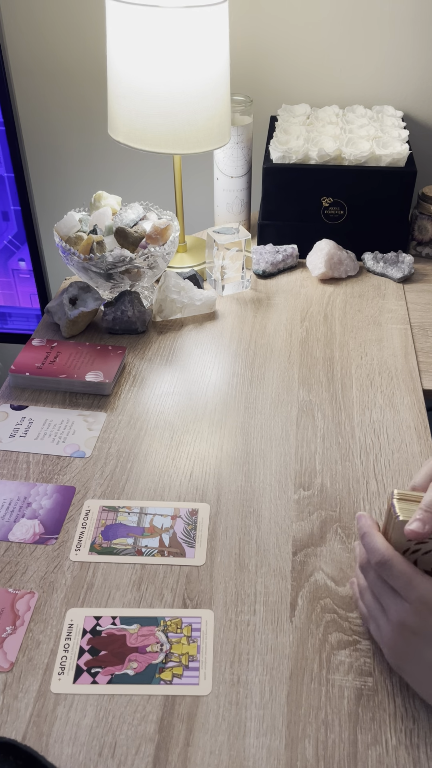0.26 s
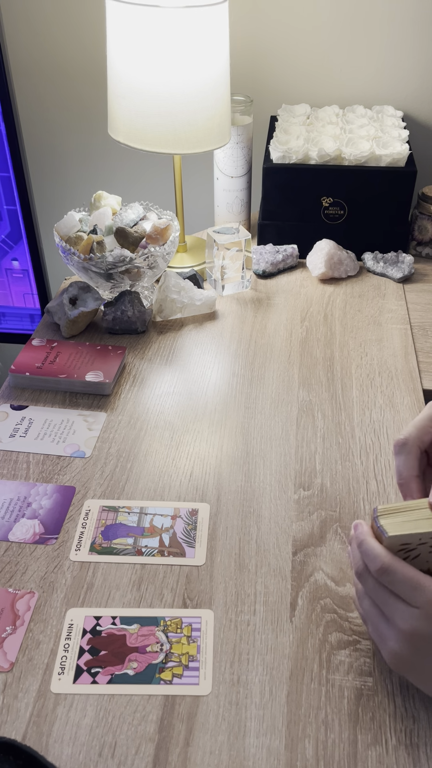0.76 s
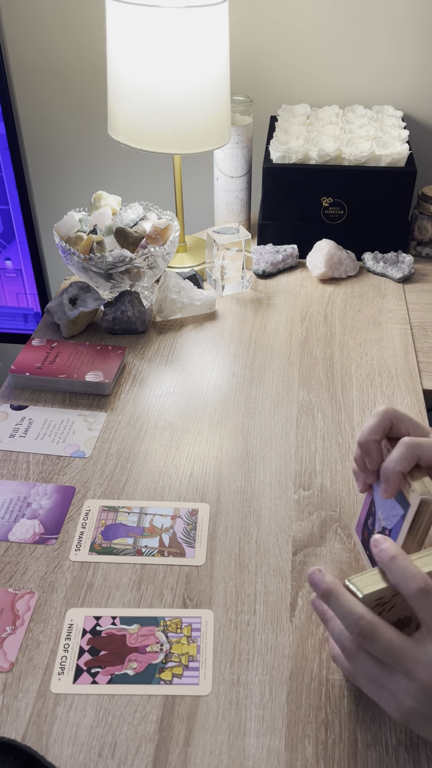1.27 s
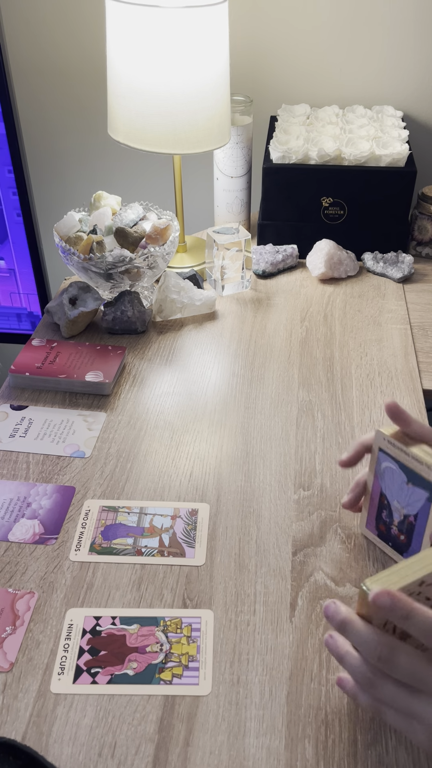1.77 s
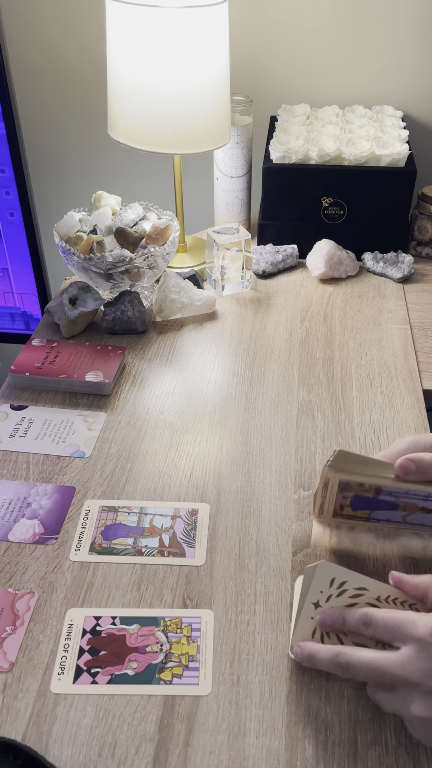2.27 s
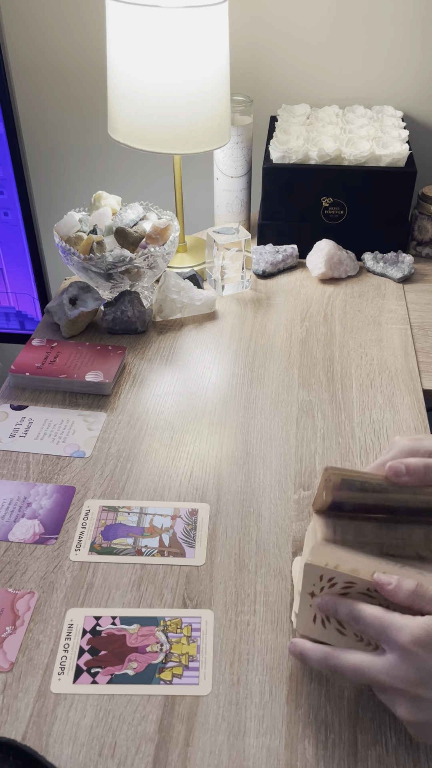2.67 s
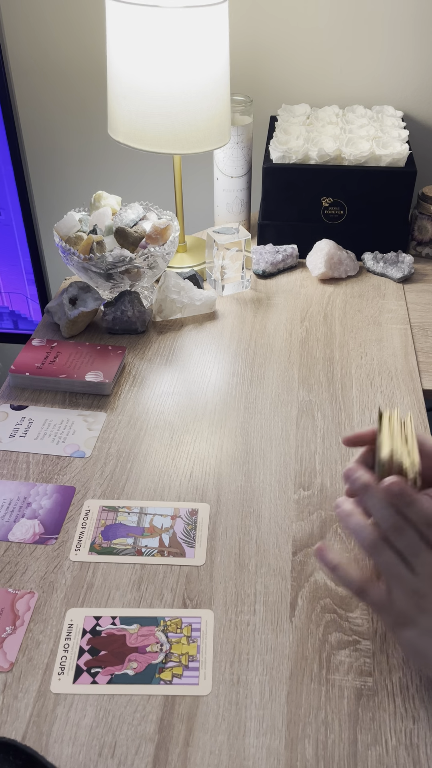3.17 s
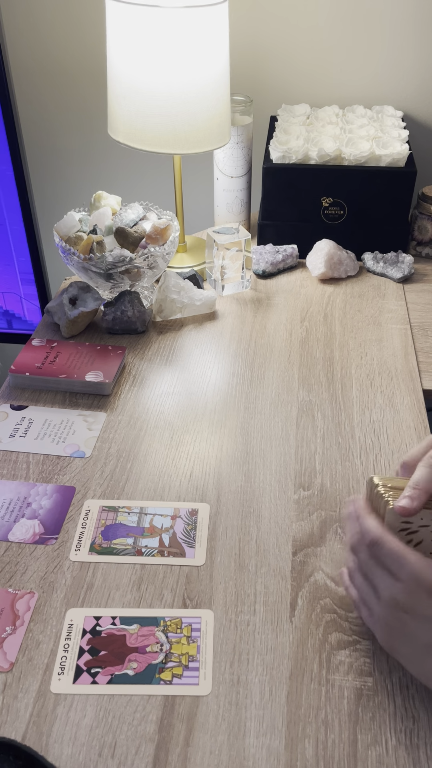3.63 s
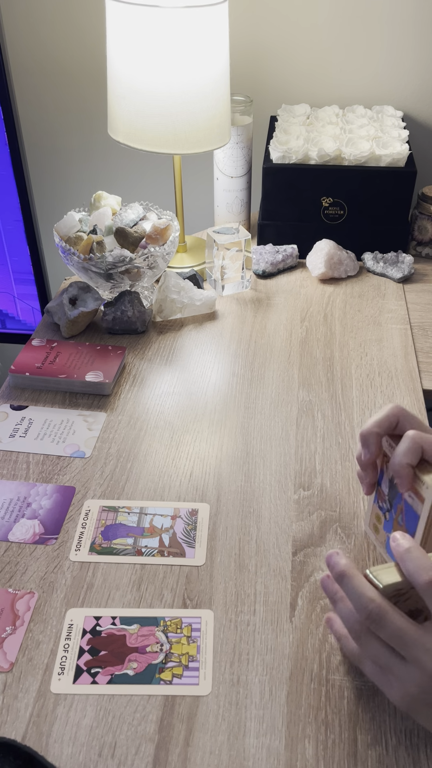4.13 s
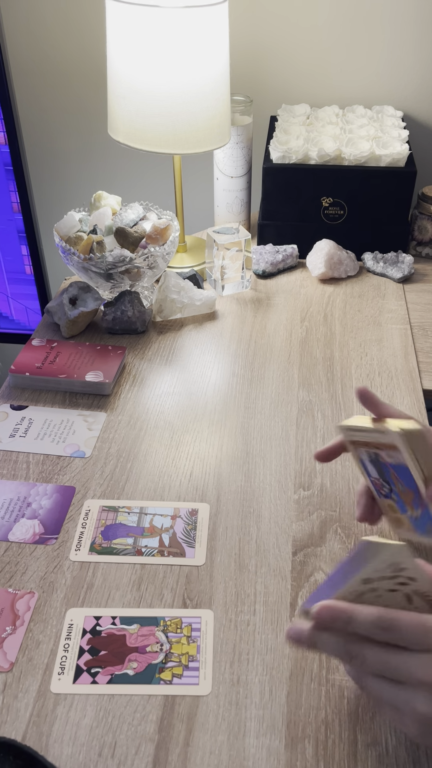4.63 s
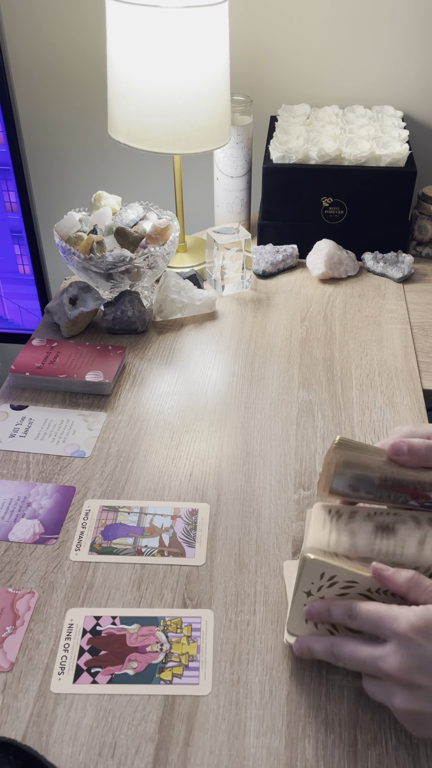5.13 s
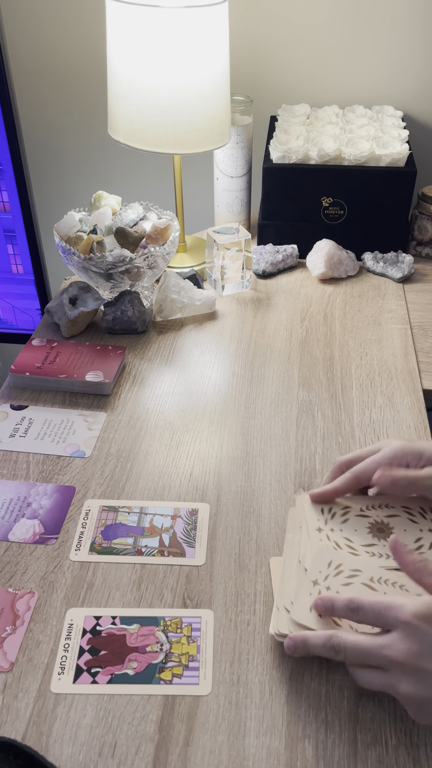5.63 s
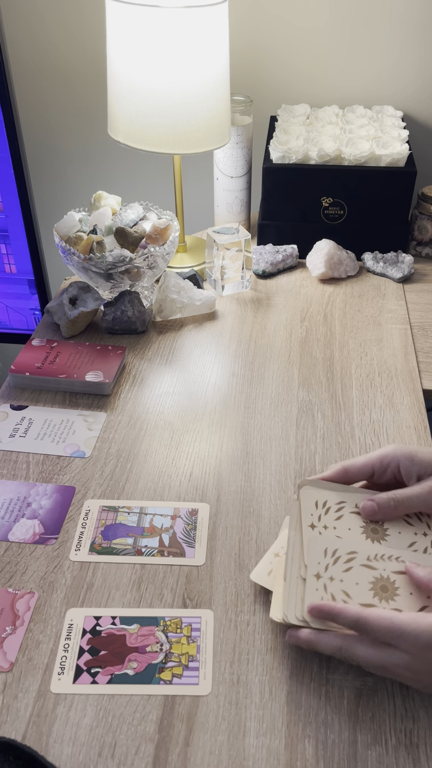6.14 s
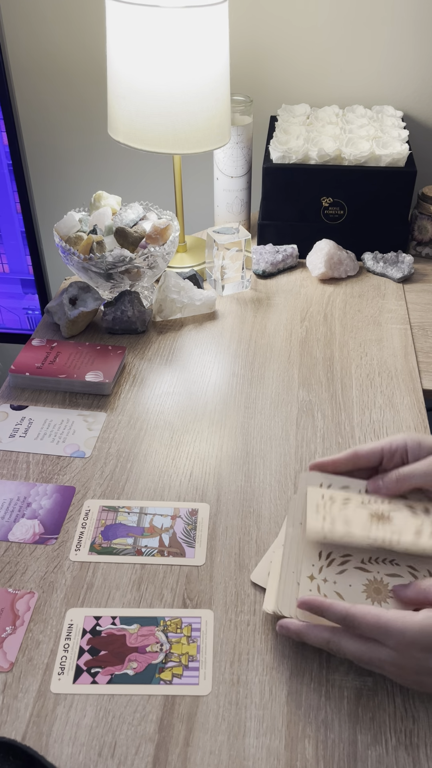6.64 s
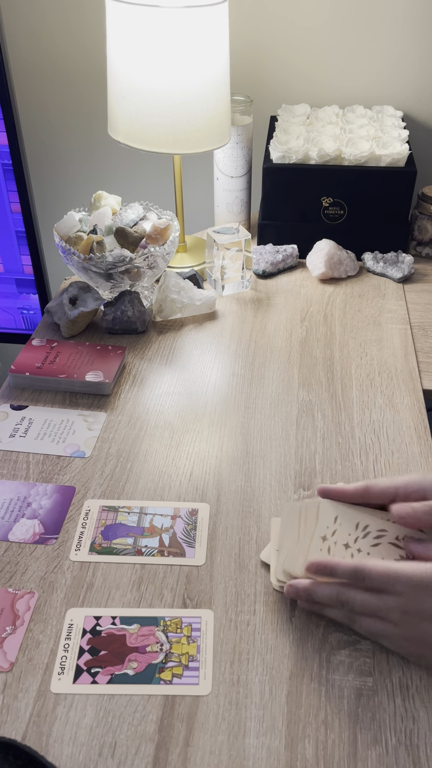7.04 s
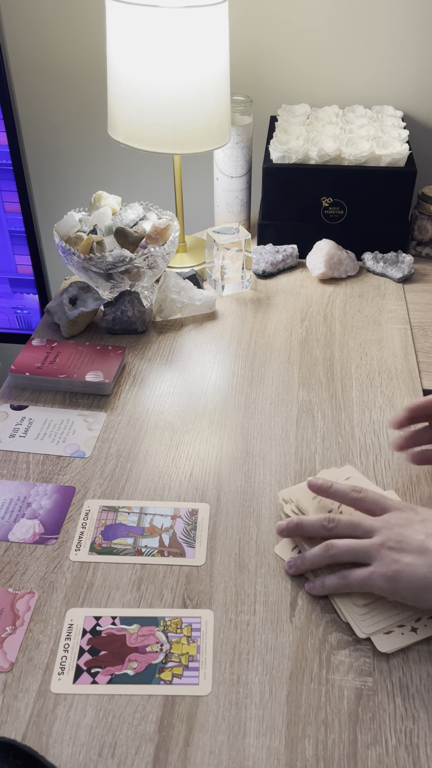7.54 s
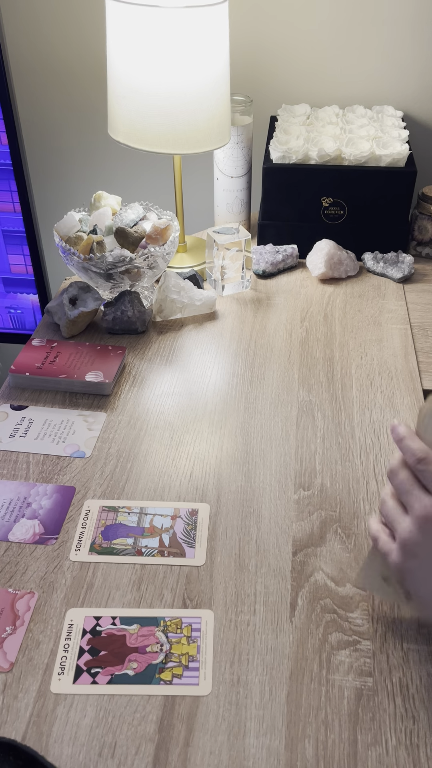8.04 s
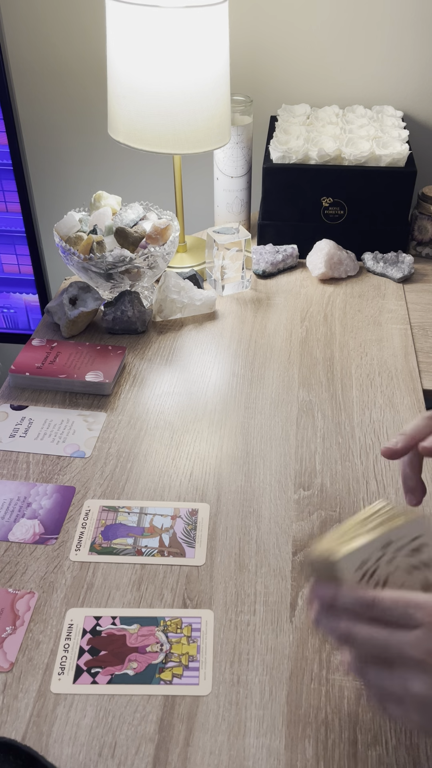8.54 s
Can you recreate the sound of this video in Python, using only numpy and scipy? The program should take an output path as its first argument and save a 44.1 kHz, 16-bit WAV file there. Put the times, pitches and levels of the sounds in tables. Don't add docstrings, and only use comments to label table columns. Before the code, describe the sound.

Stiff cards are shuffled close up on a wooden desk, with sharp claps, knocks, quick ticking riffles and papery slides over a low hum.

```python
import sys
import numpy as np
from scipy import signal
from scipy.fft import rfft, irfft
from scipy.io import wavfile
from scipy.ndimage import uniform_filter1d, minimum_filter1d

SR = 44100
rng = np.random.default_rng(int(sys.argv[2]) if len(sys.argv) > 2 else 0)


def invert_db(level):
    return 10 ** (np.asarray(level, dtype=float) / 20)


def bounce(signal):
    frames = np.transpose(np.atleast_2d(signal))
    limited = np.clip(frames, -1, 1)
    pcm = np.round(limited * 32767).astype(np.int16)
    wavfile.write(sys.argv[1], SR, pcm)


N = 388080

# [t/s, peak level/dB, air pocket f/Hz, edge tick re
# peak/dB]
HELD_CONTACTS = [(1.193, -19, 2107, -12), (1.213, -17, 2930, -19), (1.311, -18.5, 2090, -32),
                 (1.479, -20.5, 1816, -51), (2.341, -15.5, 2470, -4), (2.911, -38, 1970, -26),
                 (2.929, -29, 2080, -54), (3.004, -30, 1970, -31), (3.212, -16.5, 4220, -23), (3.32, -14, 2940, -8),
                 (3.748, -25, 1300, -44), (3.894, -19.5, 1570, -32), (4.052, -33, 2050, -6),
                 (4.063, -17, 1200, -38), (4.194, -14.5, 1670, -7.5), (4.851, -12, 2300, -14.5),
                 (4.933, -31.5, 2050, 5.5), (4.978, -13, 2000, -7.5), (4.988, -10, 2050, -10),
                 (5.004, -17, 1290, -10), (7.28, -37.5, 2360, -25), (7.69, -26, 993, -12.5),
                 (8.145, -23, 2260, -22), (8.199, -4.5, 2980, -20), (8.235, -9, 2332, -15), (8.246, 4, 2100, -3),
                 (0.116, -6, 2080, -12), (0.206, -11, 2700, -12.5), (1.522, -37, 1650, -38), (3.215, -6, 860, -30),
         (3.361, -17.5, 2370, -14), (3.662, -17, 2100, -22), (3.676, -35, 2050, -17),
         (3.812, -33, 1200, -24), (3.884, -32, 1240, -12.5), (3.957, -21, 2160, -18),
         (4.001, -32, 870, -28), (4.094, -32, 1450, -28), (4.847, -8.5, 2120, -11.5), (4.86, -19, 2530, -3),
         (4.992, -13, 1670, -16), (5.018, -21, 2970, -12.5), (5.083, -34, 1500, -20),
         (5.227, -39, 1490, -20), (5.309, -26, 1830, -16), (5.76, -32.5, 1400, -15),
         (5.796, -32, 2450, -24), (6.246, -36.5, 1320, -29), (6.52, -29, 1720, -24), (6.65, -33, 1450, 5.5),
         (6.804, -41, 2070, -3), (7.207, -41, 2220, -22), (7.299, -39, 2380, -24.5),
         (8.131, -27, 1160, -27), (8.188, -10.5, 3100, -15.5)]
# [t/s, peak level/dB, air pocket f/Hz, knock re peak/dB, edge tick re peak/dB]
KNOCKS = [(0.092, -4.5, 1444, -20, -26.5), (0.102, -5.5, 1616, -15, -16), (0.202, 5, 2790, -5.5, -7),
          (1.105, -9, 2320, -16, -17), (1.27, -9.5, 1500, -10, -30), (1.503, -10, 1610, -13, -19),
          (1.605, -28, 1020, -1, -43), (1.77, -4.5, 910, -8.5, -18.5), (1.808, 3, 2400, -8, -7.5),
          (2.218, -7, 1700, -9, -21.5), (2.326, -15.5, 1700, -4, -13), (3.221, -8.5, 897, -7, -30),
          (3.523, -6.5, 2280, -13, -6.5), (3.674, -16.5, 1860, -4.5, -12), (3.898, -24.5, 1230, 1.5, -5.5),
          (3.968, -22, 844, -3, -43), (4.077, -14.5, 1840, -6, -24), (4.382, 0.5, 1880, -19.5, -16.5),
          (4.396, 5, 1210, 0, -13), (7.678, -26, 1070, -4, -28.5), (8.125, -14.5, 1160, -4.5, -37.5),
          (8.183, -8.5, 2060, -20, -42), (8.261, -30.5, 1230, -14, -21.5), (8.773, -18.5, 890, 10.5, -12.5)]
# [t/s, peak level/dB, air pocket f/Hz, edge tick re peak/dB, spill time/ms]
FLUTTERS = [(0.097, -3, 1560, -30.5, 9), (.111, 0, 1583, -33.5, 11), (0.124, -7, 2630, -16.5, 19),
            (0.13, -7, 2090, -16, 7.7), (0.144, -9, 2570, -18, 8), (1.312, -16, 1130, -10, 4.7),
            (1.512, -12, 1770, -25, 7), (2.227, -22.5, 1870, -74, 1.37), (3.222, -6.5, 990, -10.5, 20.4),
            (3.238, -8.5, 2420, -14, 20), (3.326, -8.5, 2900, -24, 3.5), (3.975, -18, 1610, -22.5, 9.9),
            (4.089, -14.5, 1640, -32, 11.6), (4.411, -10, 2630, -14, 3.9), (8.209, -9.5, 2420, -12.5, 11),
            (8.254, 3, 1520, -10, 8.8), (8.268, -10.5, 1163, -18.5, 2.1), (8.39, -16.5, 1163, -39, 57),
            (8.417, -28, 1415, -17, 29), (8.783, -33, 1084, -32, 3.8)]
# [t/s, peak level/dB, edge tick re peak/dB]
FIRST_RIFFLE = [(2.416, -26, -37), (2.458, -23, -53), (2.469, -24.5, -5), (2.501, -24.5, 1.5),
                (2.52, -21.5, -13), (2.549, -22.5, -1), (2.563, -19, -10), (2.605, -23, -17),
                (2.617, -25, -19), (2.65, -25, 6), (2.662, -25.5, -20), (2.687, -23, -4), (2.716, -18, -14),
                (2.732, -25.5, -11), (2.749, -32, -19), (2.762, -27, -8)]
RIFFLE_POCKET_HZ, RIFFLE_SCATTER_SHARE = 1950, 0.04
# [t/s, peak level/dB, air pocket f/Hz, edge tick re peak/dB]
SECOND_RIFFLE = [(5.052, -20, 2010, -27), (5.068, -25, 1510, -13), (5.089, -24.5, 1600, 1),
                 (5.125, -35, 2060, -22), (5.141, -28, 1960, 5), (5.168, -16, 1880, -11),
                 (5.186, -38, 1920, 9), (5.224, -18.5, 1490, -11), (5.237, -31, 1120, -2),
                 (5.254, -34, 1120, 8), (5.278, -45, 2540, 7), (5.313, -26.5, 1870, 9),
                 (5.335, -39, 2100, -6), (5.357, -36, 3850, 15), (5.378, -22.5, 1690, 0),
                 (5.395, -37, 1410, -10), (5.431, -26, 2080, 7), (5.474, -30.5, 3870, 0)]
# [t/s, peak level/dB, air pocket f/Hz, edge tick re peak/dB]
LAID_CARDS = [(5.624, -48, 1030, 14), (5.636, -33, 2090, 3), (5.652, -23.5, 1150, -19),
              (5.668, -23, 1130, -15), (5.99, -24, 3860, -12), (6.013, -21.5, 1820, 1),
              (6.281, -33, 1600, -2), (6.429, -18.5, 1600, -7), (6.456, -26, 2120, -51),
              (6.509, -36, 1530, 4), (6.536, -31, 1440, -21), (6.573, -28, 1610, -2),
              (6.618, -25.5, 1310, -3), (6.64, -22, 1310, -2), (6.83, -21, 4000, -13),
              (6.905, -29.5, 3060, -1)]
# [t/s, peak level/dB, f/Hz]
BUMPS = [
    (0.116, -18.5, 354),
    (0.207, -12, 328.5),
    (1.108, -21, 520),
    (1.271, -11, 550),
    (1.515, -11.5, 358),
    (4.4, -8.5, 723),
    (3.997, -23, 540),
    (7.205, -34.5, 231),
    (7.852, -35, 498),
    (8.444, -24.5, 294),
]
HELD_KNOCK_DB, RIFFLE_KNOCK_DB, LAID_KNOCK_DB, SPILL_KNOCK_DB, BUMP_KNOCK_DB = -25.5, -11, -36, -16, 0.5
BUMP_TICK_DB = -48.5
CLAP_MS, CARD_MS, BUMP_MS, KNOCK_MS = 4.3, 3.4, 9.0, 3.45
HOLLOW_DB_PER_OCTAVE = 3
LUMPS_DB = 3

# [f/Hz, level/dB]
PUFF_TONE = [(300, 0), (700, -1.5), (1500, -4), (2500, -2.5), (3100, -5.5), (3500, -11.5)]
# [f/Hz, level/dB]
TICK_TONE = [(3500, 5), (5000, 4), (7000, -3), (9000, -4.5), (12000, -14), (15000, -13.5), (16500, -27)]
# [f/Hz, level/dB, t60/s]
DESK_MODES = [(138.9, -3, 0.37), (231, -10.5, 0.12), (364.5, 1.5, 0.086), (426.3, 1, 0.1),
              (517, 8.5, 0.026), (604, -14.5, .05), (910, -14.5, 0.03)]

# [t/s, peak level/dB, f/Hz, length/ms]
FLICKS = [(0.1329, -3, 5470, 5.1), (0.1454, -9.5, 3880, 4.4), (0.2034, -17, 5000, 2.5),
          (1.8079, -1, 5250, 3.7), (2.2174, -40, 5000, 0.83), (2.329, -54.5, 4950, 1.9),
          (2.3402, -32, 5200, 2.1), (2.47, -42, 5860, 2.5), (2.505, -29, 3780, 3.9),
          (2.5486, -31, 5080, 2.5), (2.567, -22, 5370, 1.5), (2.605, -21, 6060, 2.3),
          (2.6204, -11.5, 7100, 1.4), (2.65, -36, 7190, 1.8), (2.668, -30, 6100, 2.2),
          (2.7357, -22, 5700, 2.7), (2.7636, -27, 5750, 2.5), (3.2133, -12.5, 4050, 2.8),
          (3.24, -9, 4940, 3.8), (3.3177, -14, 5200, 5.7), (3.675, -21, 5300, 3.1),
          (4.0513, -27, 3620, 2.5), (4.0934, -23, 4560, 3.1), (4.8614, -32, 4880, 2.3),
          (4.934, -44, 4640, 2.3), (4.9813, -36, 4770, 3.1), (5.007, -18, 6040, 3.3),
          (5.0174, -15, 6000, 2.5), (5.084, -26, 5130, 2.9), (5.1275, -31.5, 5230, 3.1),
          (5.1622, -41, 4350, 2.5), (5.2505, -35, 5660, 2.5), (5.3163, -35, 5400, 2.5),
          (5.3358, -36, 5430, 2.5), (5.3577, -33, 4680, 2.5), (5.378, -21.5, 6030, 2.1),
          (5.396, -26, 5600, 2.3), (5.433, -36, 5400, 1.6), (5.9893, -27, 3900, 2.7),
          (6.3929, -35, 3800, 2), (6.429, -37, 5090, 2.7), (6.5016, -33, 4800, 2.5),
          (6.7605, -57, 5080, 4.7), (6.8309, -14, 7100, 4.8), (8.2123, -12.5, 4470, 2.5),
          (8.235, -6, 4990, 2.7), (8.2475, -12.5, 4370, 2.8)]
# [t/s, peak level/dB, f/Hz, length/ms]
CLACKS = [(.118, -17.5, 850, 2.9), (.205, -9.5, 2660, 6), (1.213, -47, 1210, 6.7), (1.272, -13, 1660, 2.8),
          (1.272, -12, 590, 8.6), (1.518, -32.5, 1650, 4.2), (1.6, -36.5, 1040, 8.1), (1.773, -25, 990, 13),
          (1.81, -6, 3200, 6.2), (3.224, -16.5, 834, 5.3), (3.53, -19, 1610, 11), (3.528, -18, 2850, 13),
          (3.677, -27.5, 1910, 15), (4.08, -25.5, 1800, 6), (4.399, -9.5, 1050, 12), (4.408, -19, 4800, 11),
          (5.086, -25.5, 1680, 4.9), (5.167, -26.5, 1930, 7), (5.225, -33, 1680, 6.8),
          (6.456, -29, 2080, 5.4), (6.641, -27.5, 1250, 8.3), (8.26, -6.5, 1150, 8.6),
          (8.259, -9, 4300, 9.1), (8.262, -7, 2900, 9.4), (1.272, -27.5, 4800, 2.7),
          (1.505, -22, 4800, 3.4), (1.519, -21, 4600, 3.1), (1.81, -12.5, 5280, 3.8),
          (2.219, -20.5, 10200, 3.6), (2.228, -31, 7950, 3.6), (2.736, -29.5, 1920, 7.1),
          (3.524, -24.5, 5400, 9.8), (4.86, -30, 11200, 3.3), (4.985, -20, 11200, 8.1),
          (5.399, -33.5, 1700, 6), (6.829, -25.5, 11500, 6), (.205, -13, 4710, 5.5),
          (6.641, -25, 2860, 6.3), (8.256, -28, 391, 13), (1.772, -19.5, 2500, 13)]
FLICK_DB = -6.5
FLICK_WIDTH_SHARE, CLACK_WIDTH_SHARE = 0.099, 0.2

# [t/s at top speed, fade time/s, level/dB, brightness/dB]
STROKES = [(0.699, 0.068, -73.5, -3), (1.069, 0.023, -67.5, 17.5), (2.061, 0.054, -68, 7),
           (2.461, 0.16, -67, 4), (2.6, 0.66, -58.5, 5.5), (2.74, 0.043, -53.5, 10),
           (3.01, 0.15, -59.5, 7.5), (3.2, 0.031, -53.5, 5), (4.69, 0.076, -68.5, 8),
           (4.84, 0.084, -63.5, -3), (5.03, 0.058, -61, 14.5), (5.26, 0.02, -49.5, 1),
           (5.39, 0.19, -56, -2), (5.52, 0.086, -58.5, -7), (5.65, 0.043, -62, 4), (5.827, 0.064, -53, 7),
           (6.038, 0.055, -51, 8.5), (6.08, 0.43, -63.5, -14), (6.368, 0.12, -58, 5.5),
           (6.511, 0.018, -46, 0.5), (6.659, 0.064, -57, -2), (6.849, 0.06, -55, 7.5),
           (7.06, 0.13, -59.5, 6), (7.192, 0.044, -60.5, 6.5), (7.339, 0.053, -57.5, 8),
           (7.6, 0.098, -67, 10), (7.68, 0.11, -52.5, -2), (7.89, 0.097, -57, -1.5), (8.04, 0.13, -71, 9.5)]
# [t/s at top speed, fade time/s, level/dB]
SHOVES = [(0.132, 0.22, -54.5), (1.112, 1, -67), (1.3, 0.16, -53.5), (1.49, 0.12, -53),
          (3.304, 0.11, -39.5), (3.55, 0.23, -53), (3.665, 0.017, -40), (3.971, 0.27, -50),
          (4.086, 0.02, -33.5), (8.201, 0.96, -78), (8.41, 0.1, -51), (8.8, 0.24, -49)]
STROKE_RISE_SHARE, SHOVE_RISE_SHARE = 0.72, 0.095
SHOVE_BRIGHT_DB = -34
FADE_DB, REST_DB = 12, -88
# [f/Hz, level/dB]
SLIDE_TONE = [(600, -8), (1200, -6), (2000, -3.5), (3500, -7.5), (6000, -6.5), (9000, -6.5), (10200, -7.5),
              (13000, -20), (15300, -13.5), (16500, -23.5)]

# [f/Hz, level/dB, t60/s]
GLASS_MODES = [(2660, -44, .2), (2862, -61, 1.0)]
# [f/Hz, t60/s]
ROOM_T60 = [(100, .45), (300, .4), (800, .36), (2000, .38), (5000, .36), (7000, .29), (9500, .15)]
# [f/Hz, rms level/dB]
HUM = [(120.2, -42), (220.7, -58), (242, -54.5)]
# [f/Hz, level per Hz/dB]
AIR_TONE = [(15, -43), (25, -10), (65, -4.5), (95, -11), (124, -2), (147, -12.5), (171, -6.5), (235, -19),
            (301, -18), (730, -28.5), (981, -36), (5370, -60.5), (9000, -67), (11700, -101)]
AIR_DB = -47.5

# [f/Hz, left lead/rad]
PORT_LEAD = [(340, -.05), (520, .15), (750, .5), (1550, -.3), (2150, 0), (2900, .9), (4100, 0), (5000, .7),
             (6100, 1.5), (8960, 2.6), (9900, 3.1), (13600, 3.2), (15300, 4.2), (16500, 4.3)]
# [f/Hz, left re right/dB]
PORT_BALANCE = [(60, -1), (130, -1.5), (290, -3.5), (450, -6), (700, -8), (1100, -2.5), (2000, -.5),
                (4000, 0)]
# [f/Hz, likeness/0-1]
PORT_SAME = [(100, 1), (300, .99), (600, .86), (1000, .9), (1500, .88), (2100, .998), (2900, .85),
             (4100, .995), (5000, .9), (7000, .93), (10000, .97), (13000, .955), (15000, .7)]


def evened(x):
    return x / np.sqrt(np.mean(x ** 2, -1, keepdims=True) + 1e-20)


def read(points, hz):
    f, value = np.transpose(points)
    return np.interp(np.log(hz + 1), np.log(f + 1), value)


def tinted(x, gain):
    size = x.shape[-1]
    return irfft(rfft(x) * gain(np.fft.rfftfreq(size, 1 / SR)), size)


def closed(tone, hz):
    outside = np.log2(np.clip(hz, tone[0][0], tone[-1][0]) / (hz + 1))
    return invert_db(read(tone, hz) - 53 * abs(outside))


def rings(modes, size):
    t = np.arange(size) / SR
    return sum(invert_db(db - 60 * t / t60) * np.sin(2 * np.pi * hz * t) for hz, db, t60 in modes)


def wander(per_s):
    return evened(tinted(rng.standard_normal(N), lambda hz: 1 / (1 + (hz / per_s) ** 2)))


def highpass(x, cut_hz):
    return signal.sosfilt(signal.butter(2, cut_hz, "high", fs=SR, output="sos"), x)


def contacts():
    s, peak_db, pocket_hz, knock_db, tick_db, spill_ms = np.transpose(contact_rows())[:, :, None]
    lead = 128
    t = np.maximum(np.arange(3072) - lead, 0) / SR
    noise = rng.standard_normal((len(s), 3, len(t)))
    crackle = invert_db(2.6 * evened(uniform_filter1d(noise[:, 2], size=40)))
    broad = 0.08 + invert_db(0.45 * peak_db)
    thin_share = np.clip((-peak_db - 7) / 12, 0, 1)
    edge_hz = 4500 + 3200 * rng.random((len(s), 1))

    def hump(hz, centre_hz):
        return broad + 1 / (1 + ((hz - centre_hz) / (0.12 * centre_hz)) ** 2)

    def puff_tone(hz):
        octaves_below = np.log2(np.maximum(0.32 * pocket_hz / (hz + 1), 1))
        hollow = invert_db(-HOLLOW_DB_PER_OCTAVE * thin_share * octaves_below)
        return closed(PUFF_TONE, hz) * hump(hz, pocket_hz) * hollow

    def tick_tone(hz):
        thin = invert_db(-0.75 * (peak_db + 15.5) * np.log2(np.maximum(hz / 6000, 1)))
        return closed(TICK_TONE, hz) * thin * hump(hz, edge_hz)

    def fade(time_s):
        return (1 - np.exp(-(t / (0.32 * time_s)) ** 2)) * np.exp(-(t / time_s) ** 0.87)

    spill_s = np.clip(spill_ms, 1, 20) / 1000
    puff = burst(noise[:, 0] * crackle * fade(spill_s), puff_tone)
    tick = burst(noise[:, 1] * crackle * fade(0.6 * spill_s), tick_tone)
    sound = invert_db(peak_db - 7.5) * (puff + invert_db(tick_db + 5.0) * tick)
    push = invert_db(peak_db + knock_db - 42.0) * (0.84 + 1.1 * noise[:, 0]) * np.exp(-t / 0.00057) * (t > 0)
    at = np.round(s * SR).astype(int) - lead + np.arange(len(t))
    cards, blows = (np.bincount(at.ravel(), x.ravel(), N + len(t))[:N] for x in (sound, push))
    knock = signal.oaconvolve(blows, rings(DESK_MODES, size=12000))[:N]
    return cards + highpass(knock, 110)


def contact_rows():
    pockets_hz = RIFFLE_POCKET_HZ * (1 + RIFFLE_SCATTER_SHARE * rng.standard_normal(len(FIRST_RIFFLE)))
    first = [(s, db, hz, tick) for (s, db, tick), hz in zip(FIRST_RIFFLE, pockets_hz)]
    groups = [(HELD_CONTACTS, HELD_KNOCK_DB, CLAP_MS),
              (first + SECOND_RIFFLE, RIFFLE_KNOCK_DB, CARD_MS),
              (LAID_CARDS, LAID_KNOCK_DB, CARD_MS)]
    rows = [(*row, KNOCK_MS) for row in KNOCKS]
    for table, knock, ms in groups:
        rows += [(s, db, hz, knock, tick, ms) for s, db, hz, tick in table]
    rows += [(s, db, hz, SPILL_KNOCK_DB, tick, ms) for s, db, hz, tick, ms in FLUTTERS]
    rows += [(*row, BUMP_KNOCK_DB, BUMP_TICK_DB, BUMP_MS) for row in BUMPS]
    return rows


def burst(noise, tone):
    z = rfft(noise)
    steps = np.repeat(rng.standard_normal((len(z), 33)), 64, axis=1)[:, :z.shape[1]]
    lumps = evened(uniform_filter1d(steps, size=64))
    flatten = 1 / np.sqrt(uniform_filter1d(abs(z) ** 2, size=28))
    gain = tone(np.fft.rfftfreq(noise.shape[1], 1 / SR)) * invert_db(LUMPS_DB * lumps) * flatten
    x = irfft(z * causal(gain))
    return x / abs(x).max(1, keepdims=True)


def causal(gain):
    log_gain = np.log(np.maximum(gain, 1e-5 * gain.max(1, keepdims=True)))
    whole = signal.hilbert(np.concatenate([log_gain, log_gain[:, -2:0:-1]], axis=1))
    return gain * np.exp(-1j * whole.imag[:, :gain.shape[1]])


def flicks():
    def edge_tone(hz, off):
        return closed(TICK_TONE, hz) * (0.3 + 1 / (1 + (off / FLICK_WIDTH_SHARE) ** 2))

    def clack_tone(hz, off):
        return 1 / (1 + (off / CLACK_WIDTH_SHARE) ** 2)

    return invert_db(FLICK_DB) * snaps(FLICKS, edge_tone) + snaps(CLACKS, clack_tone)


def snaps(rows, tone):
    s, peak_db, centre_hz, ms = np.transpose(rows)[:, :, None]
    t = np.arange(3072) / SR
    time_s = np.clip(ms, 0.3, 16) / 1000
    swell = np.sqrt(t / time_s) * np.exp(-2 * t / time_s)

    def colour(hz):
        dulling = invert_db(-0.6 * np.maximum(peak_db + 22, 0) * np.log2(np.maximum(hz / 7000, 1)))
        return tone(hz, hz / centre_hz - 1) * dulling

    snap = burst(rng.standard_normal((len(s), len(t))) * swell, colour)
    at = (np.round(s * SR).astype(int) + np.arange(len(t))).ravel()
    return np.bincount(at, (invert_db(peak_db) * snap).ravel(), N + len(t))[:N]


def slide():
    dull_gain, bright_gain = rubbing()
    grit = invert_db(3.5 * np.minimum(rng.exponential(1, N), 3)) * (rng.random(N) < 300 / SR)
    rub = rng.standard_normal(N) * (1 + 7 * uniform_filter1d(grit, size=40))
    hiss = tinted(rub, lambda hz: closed(SLIDE_TONE, hz))
    dull = tinted(hiss, lambda hz: 1 / (1 + (hz / 4000) ** 4))
    strokes = dull_gain * evened(dull) + bright_gain * evened(hiss - dull)
    return invert_db(3.5) * patchy(strokes, catch_db=1.8, patch_db=2.9)


def rubbing():
    rows = [(*row, STROKE_RISE_SHARE) for row in STROKES]
    rows += [(*row, SHOVE_BRIGHT_DB, SHOVE_RISE_SHARE) for row in SHOVES]
    s, fade_s, level_db, bright_db, rise = np.transpose(rows)[:, :, None]
    t = np.arange(0, N / SR + 0.01, 0.002)
    db = level_db - FADE_DB * np.maximum(t - s, (s - t) / rise) / np.maximum(fade_s, 0.01)
    gains = (np.sqrt((invert_db(x) ** 2).sum(0) + invert_db(REST_DB) ** 2) for x in (db, db + bright_db))
    return [np.interp(np.arange(N) / SR, t, g) for g in gains]


def patchy(x, catch_db, patch_db):
    z = signal.stft(x, nperseg=256)[2]
    chance = uniform_filter1d(np.resize(rng.standard_normal(N), z.shape), size=9)
    patches = uniform_filter1d(uniform_filter1d(chance, size=9), size=9, axis=0)
    field_db = catch_db * evened(chance.mean(0)) + patch_db * evened(patches)
    return signal.istft(z * invert_db(field_db), nperseg=256)[1][:N]


def glass(cards):
    return signal.oaconvolve(cards, rings(GLASS_MODES, size=SR))[:N] * 0.12


def room(x):
    low = tinted(x, lambda hz: 1 / (1 + (hz / 800) ** 4))
    parts = np.array([low + (x - low) * wander(110) for _ in range(3)]) / np.sqrt(3)
    return signal.fftconvolve(parts, tails(count=3), axes=1)[:, :N].sum(0)


def tails(count):
    hz, t, z = signal.stft(rng.standard_normal((count, SR * 2 // 3)), SR, nperseg=256)
    tail = signal.istft(z * invert_db(-60 * t / read(ROOM_T60, hz)[:, None]), SR, nperseg=256)[1]
    tail *= np.clip(np.arange(tail.shape[1]) / SR / 0.005, 0, 1)
    return tail / np.linalg.norm(tail, axis=1, keepdims=True)


def background():
    t = np.arange(N) / SR
    drift_s = np.cumsum(0.0028 * wander(1.0)) / SR
    hum = 0
    for hz, db in HUM:
        level = invert_db(db + 3.5 + 0.8 * wander(10.0))
        hum = hum + level * np.sin(2 * np.pi * (hz * (t + drift_s) + rng.random()))
    air = evened(tinted(rng.standard_normal(N), lambda hz: closed(AIR_TONE, hz)))
    return hum + invert_db(AIR_DB + 0.45 * wander(6.5)) * air


def scene():
    cards = contacts() + slide() + flicks()
    cards = cards + glass(cards)
    near = cards + invert_db(-11.5) * room(cards)
    other = invert_db(-1) * (np.roll(cards, 60) + room(cards))
    return np.array([near + background(), other + background()])


def ports(dry):
    sign = np.array([[1], [-1]])

    def same(hz):
        return np.clip(read(PORT_SAME, hz), 0, 1)

    def port(hz):
        return invert_db(sign * read(PORT_BALANCE, hz) / 2) * np.exp(0.5j * sign * read(PORT_LEAD, hz))

    shared = tinted(dry[0], lambda hz: np.sqrt((1 + same(hz)) / 2))
    apart = tinted(dry[1], lambda hz: np.sqrt((1 - same(hz)) / 2))
    return tinted(shared + sign * apart, port)


def limited(pair):
    held = -minimum_filter1d(-abs(pair).max(0), size=201)
    crest = signal.oaconvolve(held, np.hanning(201) / 100, "same")
    return pair / (1 + (crest / 0.95) ** 4) ** 0.25


def top_cut(x):
    return signal.sosfilt(signal.butter(12, 17140, fs=SR, output="sos"), x)


def record(dry):
    pair = highpass(ports(dry), 50)
    pair = tinted(pair, lambda hz: 1 / (1 + (hz / 15950) ** 90))
    pair = limited(pair)
    return top_cut(pair)


dry = scene()
out = record(dry)
bounce(out)
```